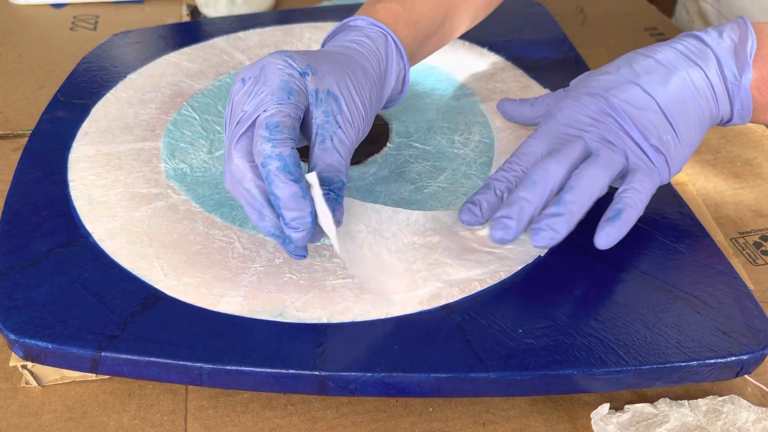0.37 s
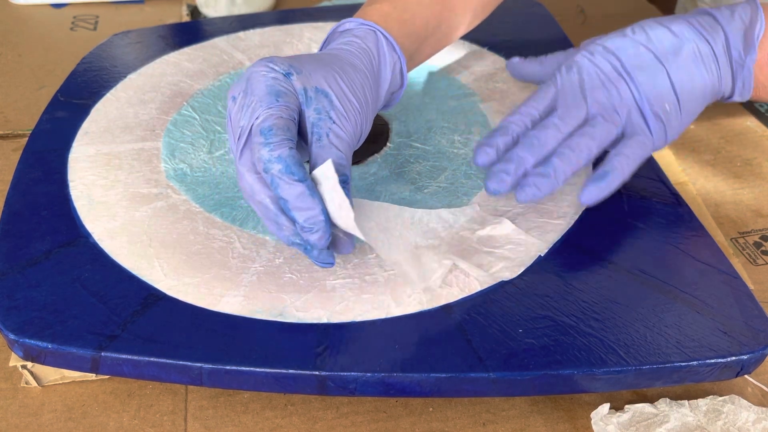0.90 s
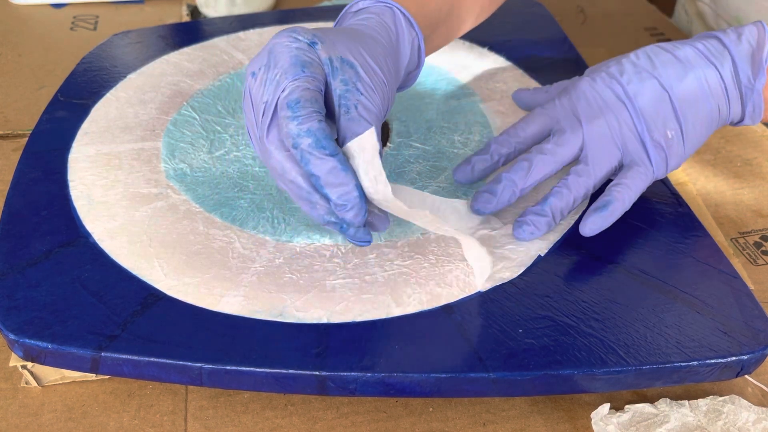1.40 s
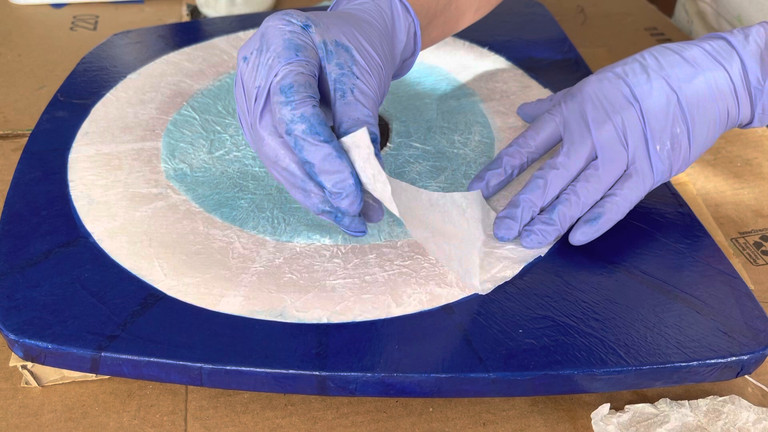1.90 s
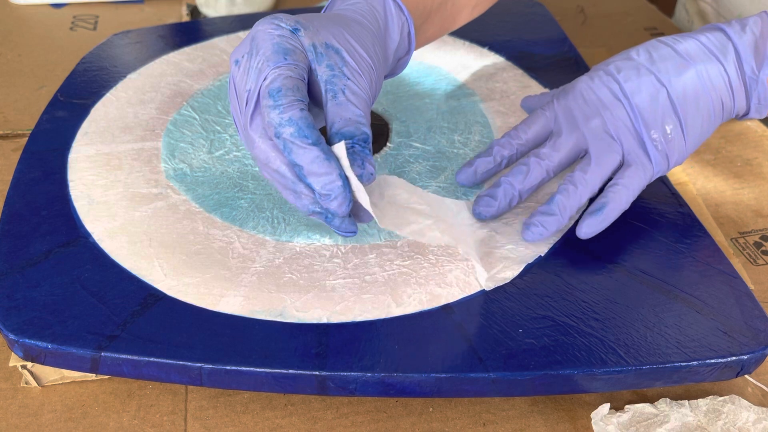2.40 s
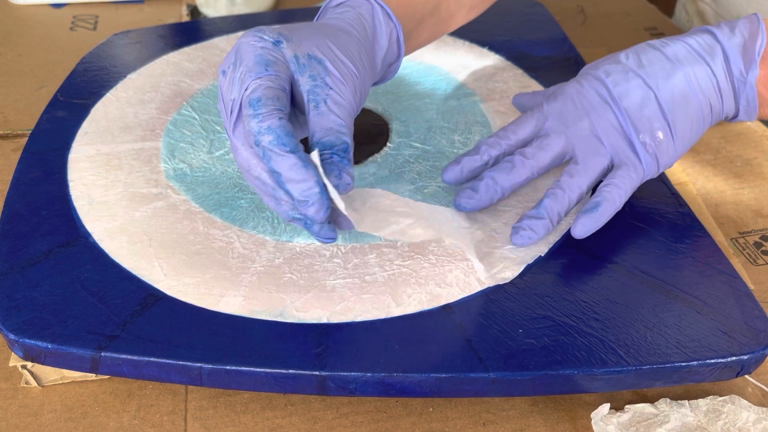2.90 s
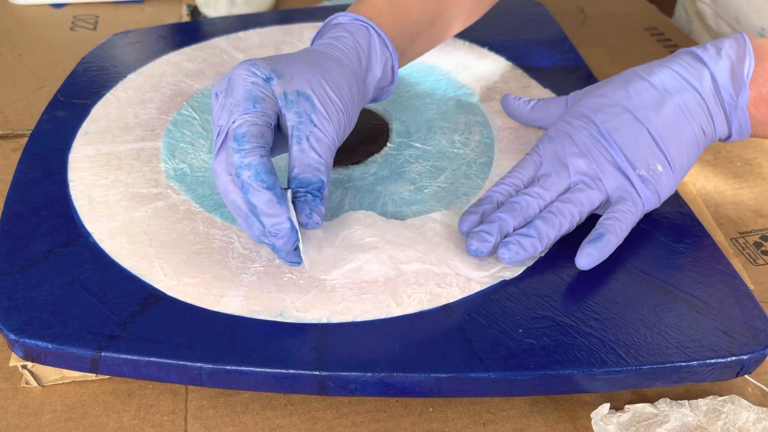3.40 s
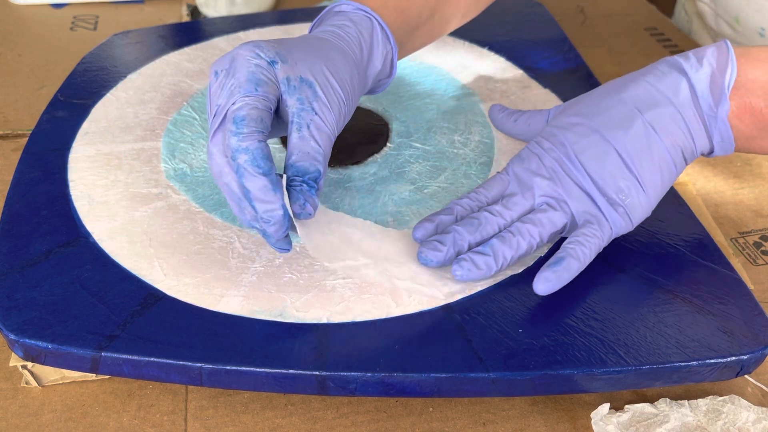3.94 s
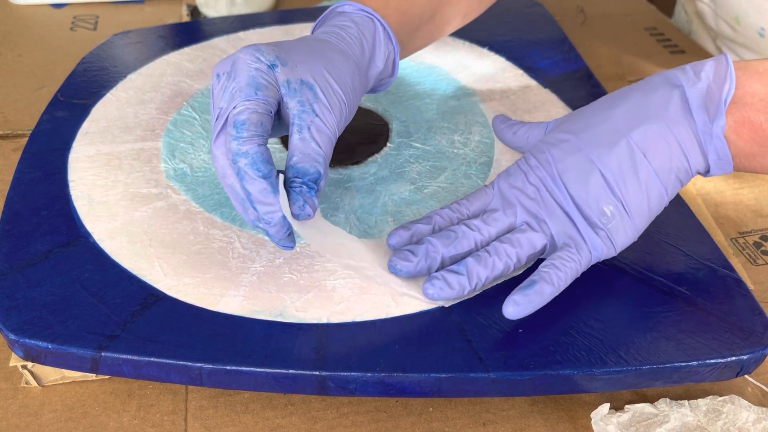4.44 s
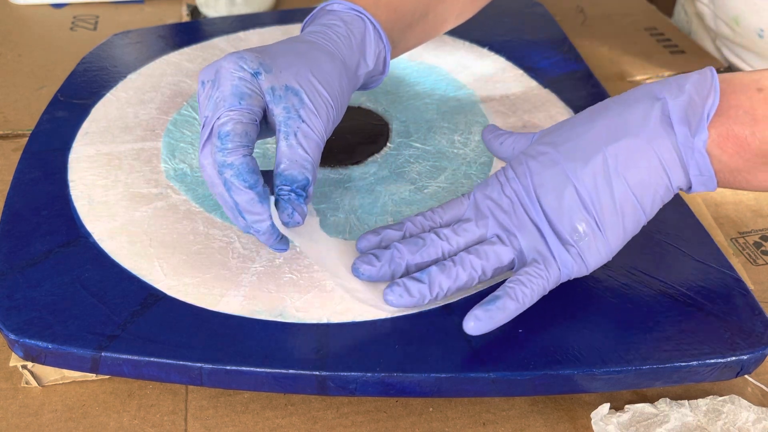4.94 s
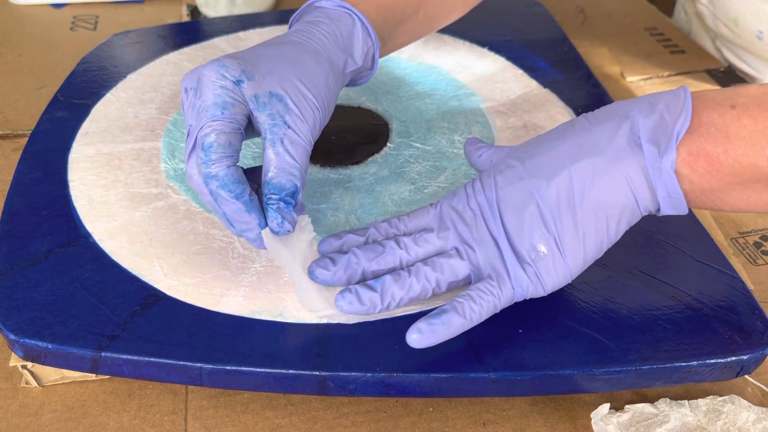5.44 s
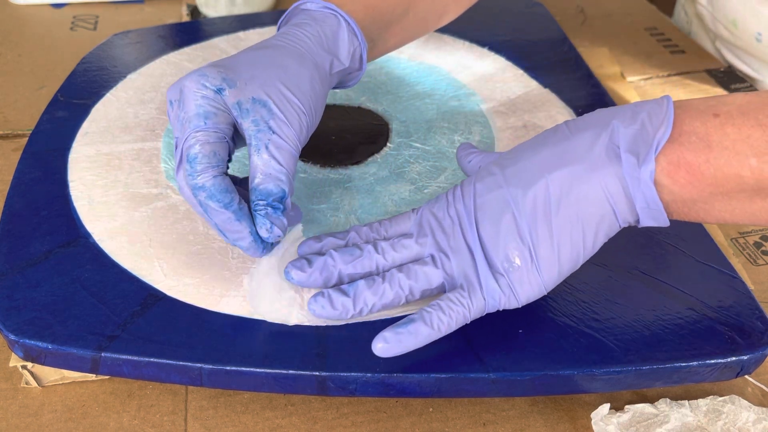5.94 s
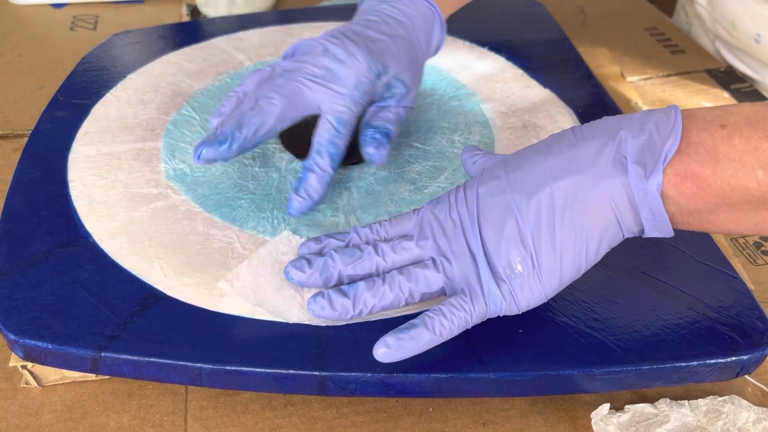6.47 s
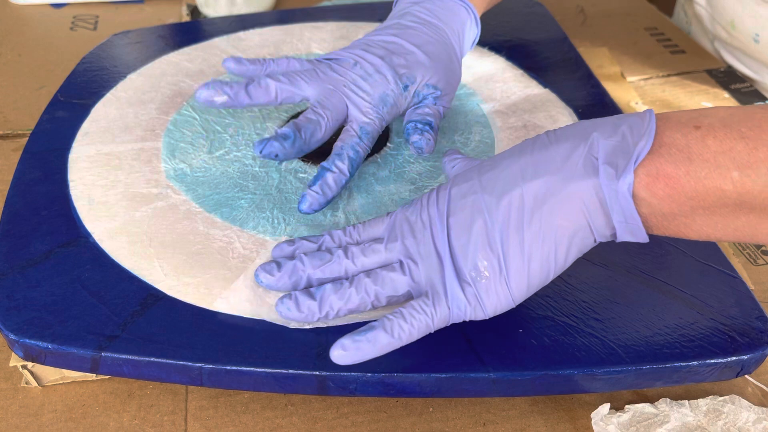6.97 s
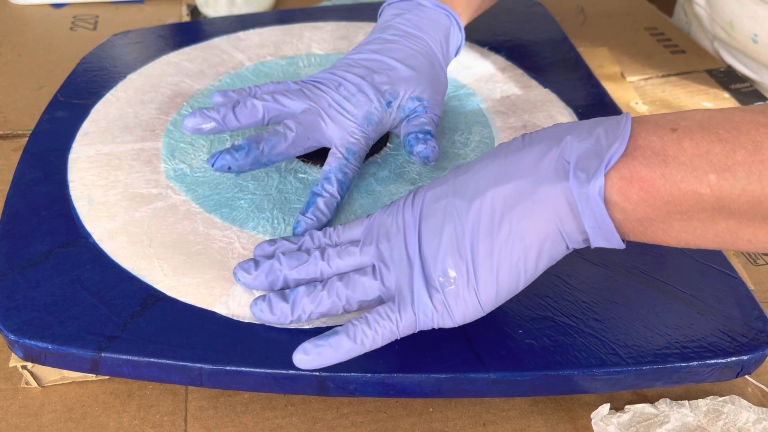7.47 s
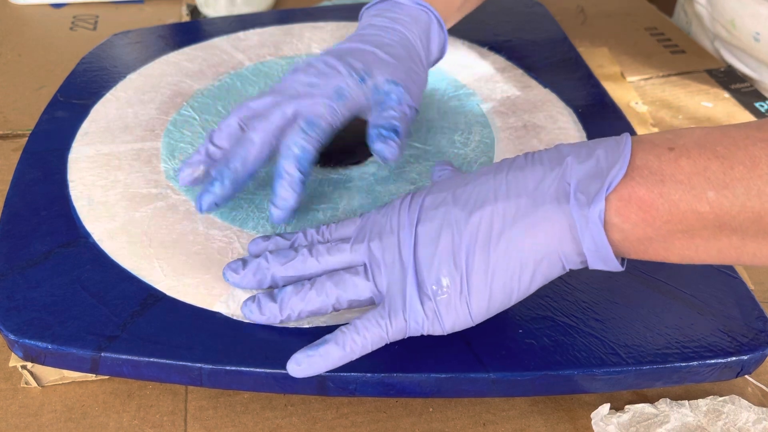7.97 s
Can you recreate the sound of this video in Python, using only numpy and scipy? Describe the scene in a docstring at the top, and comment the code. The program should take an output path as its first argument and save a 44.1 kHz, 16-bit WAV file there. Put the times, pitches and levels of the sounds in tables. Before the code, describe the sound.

Very close in stereo, gloved fingers tug and press thin tissue paper onto a board: crisp crackles and tiny snaps at first, while heavy footsteps elsewhere in the house boom low and rattle loose things. Then long hissing smoothing strokes take over, dotted with small ticks, until one sharp loud crackle near the end. A faint glove squeak follows in the quiet room.

```python
"""Gloved hands smoothing tissue paper

Gloved fingers press and smooth thin tissue paper onto a glued board, close under a two-port microphone.
The paper rustles in fine random grains; creases snap as short bursts of noise; a glove squeaks faintly.
Heavy steps elsewhere in the house set off decaying floor tones, thuds and rattles, over the filtered
noise of a quiet room and a separate low rumble."""
import sys
import numpy as np
from scipy import signal
from scipy.fft import rfft, irfft
from scipy.io import wavfile
from scipy.ndimage import uniform_filter1d

SR = 44100
rng = np.random.default_rng(int(sys.argv[2]) if len(sys.argv) > 2 else 0)


def volts(x):
    """Linear amplitude factor 10**(x/20) for a level x in dB, scalar or array-like."""
    e = np.asarray(x, float) / 20
    return 10 ** e


def master(y):
    """Save y as 16-bit WAV."""
    cut = np.clip(np.atleast_2d(y).T, -1, 1)
    pcm = np.round(cut * 32767)  # scale
    wavfile.write(sys.argv[1], SR, pcm.astype(np.int16))


N = 357342  # length in samples

# how far the left port runs ahead of the right: pitch_hz, lead_radians
LEFT_LEAD = [(0, 0), (600, 0.0), (950, 1.2), (1290, -0.1), (1640, -0.3), (3010, 1.0), (4910, 0.7),
             (6720, -0.1), (7750, 0.5), (8870, -0.1), (9730, -2.9), (10800, -3.4), (11500, -6.3),
             (13100, -6.3)]
# how much louder the left port is than the right: pitch_hz, difference_db
LEFT_LOUDER = [(60, 3), (150, 2), (360, 3), (880, 1), (2160, 2.5), (5280, 5.5), (8500, 1.5), (12000, -0.5)]


def rustle():
    """Thousands of fibres slip each second, in clumps, a few of them hard; the glove rubs below."""
    # colour of the rustle, brightest near 7 kHz, dark above 12 kHz: pitch_hz, relative_level_db (per Hz)
    paper_colour = [(1500, -32.5), (2500, -29), (3500, -9.5), (4800, -9), (6300, -0.5), (7200, 0.5),
                    (9000, -9), (9550, -9), (9850, -14.5), (10450, -27), (10800, -5.5), (11500, -20.5),
                    (12000, -38), (12400, -59.5), (13500, -65)]
    # colour of the dull rub of the glove: pitch_hz, relative_level_db (per Hz)
    rub_colour = [(300, -36), (600, -35), (1200, -15), (2200, -5.5), (3500, 9), (5000, -11), (8000, -59.5)]
    # rub relative to the rustle: time_s, level_db
    rub_share = [(0, -11.5), (.5, -8), (2, -8), (3.5, -14), (3.65, -9), (3.9, -13.5), (5.9, -7.5),
                 (6.9, -13.5), (7, -8), (7.3, -11.5), (7.53, -7), (7.62, -21), (7.8, -13), (8.1, -13.5)]
    press_crisp_db, stroke_crisp_db = 2, -0.52  # spread of slip sizes: pressing crackles, smoothing hisses
    slips_per_s = 5000

    level, stroking = fingers()
    crisp_db = press_crisp_db + (stroke_crisp_db - press_crisp_db) * stroking
    crisp_db = np.clip(crisp_db, 0, 8)  # at 0 dB all slips have one size before their random draw below
    clumps = evened(uniform_filter1d(uniform_filter1d(rng.standard_normal(N), 200), 200))
    size = volts(crisp_db * (np.minimum(rng.exponential(1, N), 5.5) + 1.8 * clumps))
    happens = rng.random(N) < slips_per_s / SR
    slips = size * happens * rng.standard_normal((2, N))
    slips *= level / np.sqrt(uniform_filter1d((slips ** 2).mean(0), 3000))  # follow the fingers
    slips += volts(-5.5) * room(slips)

    paper = unit_colour(slips + volts(-5.0) * ticks(level), paper_colour)
    rub_db = np.interp(np.arange(N) / SR, *np.transpose(rub_share))
    rub = volts(rub_db) * unit_colour(slips, rub_colour)
    return ports(patchy(paper + rub))  # the colour wanders at random


def fingers():
    """How hard the paper is worked at each moment, and the share of that power due to strokes."""
    # short presses and tugs, times over the last 20 dB: peak_s, level_db, rise_s, fall_s
    presses = [(.042, -46.5, 0.062, 0.031), (0.107, -39, 0.019, 0.028), (.18, -60.5, 0.19, 0.29),
               (0.34, -57.5, 0.049, 0.051), (.469, -67.5, 0.037, 0.072), (.6, -63.5, 0.15, .2),
               (.804, -65, 0.022, 0.053), (1.062, -50, 0.07, 0.024), (1.133, -43.5, 0.018, 0.048),
               (1.207, -50, 0.077, 0.091), (1.34, -66, .08, 0.43), (1.437, -57, 0.068, 0.25),
               (1.632, -61.5, 0.066, 0.019), (1.668, -82, .05, .12), (1.746, -49.5, 0.022, 0.068),
               (1.816, -50.5, 0.13, 0.041), (1.925, -58, 0.03, 0.15), (2.021, -58, 0.046, 0.14),
               (2.147, -48, .05, 0.086), (2.303, -67.5, 0.46, 0.39), (2.68, -53, 0.048, 0.072),
               (2.776, -52, 0.025, 0.078), (2.889, -54, 0.023, 0.031), (3.107, -62, 0.097, 0.097),
               (3.219, -62, 0.027, 0.051), (3.276, -56, 0.045, 0.12), (3.396, -69, .15, 0.077),
               (3.52, -68, 0.063, 0.18), (5.968, -61, 0.032, 0.14), (6.096, -55.5, 0.073, 0.087),
               (6.31, -53, 0.14, 0.15), (6.854, -31.5, 0.043, 0.055), (7.884, -55, 0.1, 0.22)]
    # two long strokes that smooth the paper down, one list each: time_s, rustle_level_db
    strokes = [
        [(3.57, -84), (3.62, -54.5), (3.686, -62.5), (3.835, -56), (4.047, -64.5), (4.113, -57), (4.374, -60.5),
         (4.496, -53.5), (4.582, -60), (4.927, -54.5), (5.3, -55.5), (5.781, -65), (5.833, -59.5), (5.923, -76)],
        [(6.33, -80), (6.378, -65.5), (6.465, -55), (6.621, -61.5), (6.659, -55.5), (6.793, -53.5),
         (6.948, -63.5), (7.056, -63), (7.295, -56.5), (7.363, -64.5), (7.445, -65), (7.485, -71),
         (7.695, -64.5), (7.752, -64), (8.0, -73), (8.1, -57)],
    ]
    hiss_floor_db = -78.5  # a faint steady hiss under the rustle

    t = np.arange(N) / SR
    pressing = volts(hiss_floor_db) ** 2
    for peak_s, db, rise_s, fall_s in presses:
        distance = np.maximum((peak_s - t) / abs(rise_s), (t - peak_s) / abs(fall_s))
        pressing = pressing + volts(2 * (db - 20 * distance))  # doubled dB gives power
    smoothing = 0
    for rows in strokes:
        smoothing = smoothing + volts(2 * np.interp(t, *np.transpose(rows), left=-200, right=-200))
    return np.sqrt(pressing + smoothing), smoothing / (pressing + smoothing)


def ticks(level):
    """Small creases pop at random, louder as the fingers work harder, each a few cycles at one of 12 pitches."""
    out, t = np.zeros(N), np.arange(100) / SR
    for hz in np.geomspace(3000, 11500, 12):
        happens = rng.random(N) < 14 / SR  # about 14 a second at each pitch
        size = volts(2.2 * np.minimum(rng.exponential(1, N), 4)) * happens
        pop = np.sin(2 * np.pi * hz * t) * hz * t * np.exp(-hz * t / 1.64)
        out += signal.oaconvolve(size * level, pop)[:N]
    return out


def snaps():
    """Each crease cracks in about a millisecond, leaning to its own pitch, and knocks the board."""
    # creases that crack at known moments, loud ones and faint lone ticks:
    # peak_s, level_db, pitch_hz, knock_db (into the board, relative)
    placed_creases = [(0.0397, -32, 7500, -32), (0.0917, -32.5, 6600, -15), (0.095, -27.5, 7150, -34),
                      (0.108, -28.5, 6450, -28), (.111, -29, 7200, -38), (.146, -37.5, 6330, -35),
                      (0.2376, -37.5, 6240, -33), (0.2614, -41, 5100, -26), (0.3077, -37, 6600, -19.5),
                      (0.3291, -34.5, 5400, -26), (0.4642, -39.5, 6550, -35), (0.5304, -45.5, 6860, -35),
                      (.5538, -44, 6600, -25), (0.654, -33, 5850, -25), (0.6862, -46, 4900, -17),
                      (0.7936, -39, 7400, -30), (.804, -41.5, 6900, -34), (1.0013, -52, 6430, -30),
                      (1.0313, -54, 6450, -30), (1.1051, -41, 6500, -23), (1.136, -21, 6100, -19),
                      (1.172, -33, 7100, -29), (1.1951, -28.5, 6660, -28), (1.1993, -36, 5910, -37),
                      (1.21, -36, 6550, -22), (1.2171, -19, 7500, -26.5), (1.2446, -29.5, 6750, -19),
                      (1.2646, -28, 6550, -31), (1.325, -33, 6740, -24.5), (1.416, -45, 6600, -3.5),
                      (1.429, -34, 6000, -16), (1.438, -31, 7800, -19), (1.4561, -31.5, 6800, -33),
                      (1.4926, -39, 6800, -4), (1.5227, -38.5, 6600, -14), (1.605, -41.5, 6700, -17),
                      (1.7205, -40.5, 4200, -22), (1.7352, -36, 6270, -15), (1.7465, -38.5, 7320, -10),
                      (1.7714, -36.5, 6300, -11), (1.9013, -39, 6500, -19), (1.9147, -32.5, 6700, -55),
                      (2.078, -45, 6540, -32), (2.101, -50, 6800, -33), (2.118, -48, 6000, -23),
                      (2.142, -32, 7760, -26), (2.2338, -33, 8150, -26), (2.29, -43, 6540, -20),
                      (2.322, -35, 6600, -25), (2.737, -40, 7100, -21), (2.7613, -36, 6950, -28),
                      (2.8698, -41.5, 6700, -42), (3.052, -49.5, 5640, -8), (3.264, -42.5, 6700, -30),
                      (3.39, -52, 6000, -22), (3.4402, -45.5, 7300, -40), (3.522, -53, 5770, -37),
                      (3.6121, -41, 6050, -18), (4.1067, -53, 6800, -34), (4.214, -36.5, 7000, -34),
                      (4.2543, -38, 6840, -34), (4.5437, -35.5, 5250, -28), (4.5936, -37.5, 7750, -26),
                      (4.687, -33.5, 7160, -59), (4.7888, -36.5, 6440, -34), (4.8723, -34.5, 6440, -37.5),
                      (4.8976, -32.5, 6700, -35), (5.0407, -36.5, 7590, -26), (5.154, -35.5, 5900, -31),
                      (5.1982, -44.5, 8800, -27), (5.294, -31.5, 7460, -37), (5.4712, -34.5, 7500, -40),
                      (5.8348, -43, 6300, -19), (5.9655, -38.5, 7800, -24), (6.0658, -45.5, 7060, -14),
                      (6.1406, -44.5, 6500, -18), (6.264, -38.5, 8200, -49), (6.299, -24, 7840, -52),
                      (6.3181, -19.5, 6700, -27), (6.3943, -39.5, 5260, -29), (6.4684, -49, 6860, -24),
                      (6.513, -40, 8600, -39), (6.5577, -36, 7040, -36), (6.5825, -36.5, 7300, -38),
                      (6.6458, -38.5, 7100, -25), (6.67, -36.5, 6260, -21.5), (6.6872, -19, 6400, -34),
                      (6.766, -36, 7210, -25), (6.777, -35, 5950, -28), (6.8032, -31, 5700, -33),
                      (6.8126, -33, 5760, -25), (6.83, -32, 5480, -28), (6.835, -33, 5500, -30),
                      (6.839, -25, 5440, -27), (6.8445, -20.5, 6020, -19), (6.852, -10, 5460, -38),
                      (6.8554, -6.5, 8440, -30), (6.8697, -30, 6890, -34), (6.875, -29, 6800, -29),
                      (7.496, -50, 6730, -30), (7.513, -47, 7100, -32), (7.6462, -53, 6740, -42),
                      (7.6798, -40.5, 7700, -33), (7.745, -41, 7060, -41), (7.7576, -37.5, 7500, -47),
                      (7.8401, -33, 9500, -24), (7.877, -32.5, 6750, -27), (7.9543, -38, 7900, -15.5),
                      (7.982, -44.5, 6490, -17), (8.0171, -47, 7420, -27)]
    # colour of a crack: pitch_hz, relative_level_db (per Hz)
    crack_colour = [(1300, -41.5), (3000, -16.5), (4000, -12), (5000, -8), (8000, -6), (10100, -8.5),
                    (11200, -1.5), (12600, -19.5), (13800, -35)]
    lean_width_hz = 1500

    rows = placed_creases + lesser()
    out, t = np.zeros(N), np.arange(-90, 500) / SR
    crack_noise, knock_noise = rng.standard_normal((len(rows), 2, len(t))).transpose(1, 0, 2)
    rise = np.exp(t / 0.00046)
    decay = np.exp(-abs(t) / 0.0006) + 0.17 * np.exp(-abs(t) / 0.0013)
    shape = np.where(t < 0, rise, decay)  # a burst that swells for half a millisecond, then dies
    cracks = colour(crack_noise * shape, crack_colour)
    knock_shape = np.exp(-abs(t) / np.where(t < 0, .001, .004))
    knock_band = signal.butter(2, [600, 2600], "band", fs=SR, output="sos")
    knocks = signal.sosfilt(knock_band, knock_noise * knock_shape)
    r = np.exp(-np.pi * lean_width_hz / SR)
    for (s, db, hz, knock_db), crack, knock in zip(rows, cracks, knocks):
        leaning = signal.lfilter([1], [1, -2 * r * np.cos(2 * np.pi * hz / SR), r * r], crack)
        crack = evened(crack) + 2.97 * evened(leaning)
        knock = volts(knock_db) * knock / abs(knock).max()
        add(out, s + t[0], volts(db) * (crack / abs(crack).max() + knock))

    hz = np.fft.rfftfreq(N, 1 / SR)
    half = volts(read(LEFT_LOUDER, hz) / 2)
    to_ports = np.array([half * np.exp(1j * read(LEFT_LEAD, hz)), 1 / half])
    pair = irfft(rfft(out) * to_ports, N)
    return pair + volts(-7.0) * room(pair)


def lesser(count=150):
    """Further creases crack at random moments, as strong as the paper is worked: rows as in snaps()."""
    over_db, stroke_db, spread_db = 7.5, 3.5, 2  # over the rustle; further lift under a stroke; spread
    usual_hz, spread_hz = 6700, 1840
    usual_knock_db, knock_spread_db = -36, 4

    when, size = rng.random((count, 2)).T
    pitch, knock = rng.standard_normal((count, 2)).T
    at = (when * (N - 600)).astype(int) + 100
    level, stroking = fingers()
    db = 20 * np.log10(level[at]) + over_db + stroke_db * stroking[at]
    db = db - spread_db * np.log(1 - .95 * size)  # a few are much louder
    return list(zip(at / SR, db, usual_hz + spread_hz * pitch, usual_knock_db + knock_spread_db * knock))


def squeaks():
    """Rubber sticks and slips on the wet paper: a narrow, trembling whistle."""
    # glove squeaks: start_s, end_s, first_pitch_hz, settled_pitch_hz, level_db (before fades and sides)
    whistles = [(3.02, 3.11, 1350, 1040, -80), (7.56, 7.76, 7200, 7030, -62), (8.02, 8.12, 7050, 7200, -61),
                (8.04, 8.1, 8800, 8800, -69)]
    tremble_filter = signal.butter(2, 70, fs=SR, output="sos")  # trembles slower than about 70 Hz

    out = np.zeros(N)
    for s, end, first_hz, last_hz, db in whistles:
        t = np.arange(0, end - s, 1 / SR)
        gliding_hz = last_hz + (first_hz - last_hz) * np.exp(-4 * t / t[-1])
        turns = np.cumsum(gliding_hz) / SR
        tremble = signal.sosfilt(tremble_filter, rng.standard_normal((len(t), 2)) @ [1, 1j])
        whistle = evened((tremble * np.exp(2j * np.pi * turns)).real)
        add(out, s, volts(db) * whistle * signal.windows.tukey(len(t), .5))
    return out * volts([[1.5], [-1.5]])  # a little louder on the left


def steps():
    """A soft heel sets the joists booming; the boards thud first and loose things rattle after."""
    # steps, levels relative: start_s, boom_db, floorboard_thud_db, rattle_db, thud_pitch_hz
    footfalls = [(0.516, -38, -47.5, -55.5, 311), (0.963, -33.5, -41, -51.5, 298),
                 (1.436, -22.5, -38.5, -41.5, 272), (1.986, -17.5, -37, -42, 249),
                 (2.584, -18, -42.5, -48, 167), (4.45, -73, -65.5, -68.5, 360),
                 (4.572, -69, -68.5, -97, 364), (4.68, -79, -67.5, -90, 280), (4.915, -77, -60.5, -66, 298),
                 (5.03, -62, -61, -74, 200), (5.22, -41.5, -56, -62, 218), (5.379, -65, -62.5, -70, 170),
                 (6.9, -71, -62.5, -75, 171), (7.2, -86, -59, -82, 230), (7.939, -53, -52, -65, 207)]
    # what the floor booms with; close neighbours make it swell and beat: pitch_hz, level_db, t60_s
    joist_tones = [(51.17, 3, 0.49), (59.3, 4.5, 0.64), (66.6, -9, 0.65), (43, -18, 0.22),
                   (79.5, -3.5, 0.53), (57, -17, 0.083)]
    # what the floorboards ring with: pitch_hz, level_db, t60_s
    board_tones = [(139, -6.5, 0.47), (156.05, 0, 0.5), (190, -2, 0.54), (254.5, -6, 0.54)]
    # colour of the thud: pitch_hz, relative_level_db (per Hz)
    thud_colour = [(56, -23.5), (95, 1.5), (108, -11.5), (141, -0.5), (194, -8), (344, -17), (420, -18),
                   (550, -37.5), (920, -120)]
    # colour of the rattle: pitch_hz, relative_level_db (per Hz)
    rattle_colour = [(250, -39), (420, -6.5), (648, -9), (954, -9.5), (1380, -20), (2440, -16.5),
                     (3800, -36), (4940, -46), (8360, -120)]
    sink_share, sink_s = 0.59, 0.13  # the thud's pitch sinks towards this share as the weight settles
    ring_db, ring_width_hz = 1.5, 81  # each spot of floor favours its own pitch
    waver_db = 1  # the level of thuds and rattles wavers at random

    boom, thud, rattle, ring = np.zeros(N), np.zeros(N), np.zeros(N), np.zeros((2, N))
    t = np.arange(SR) / SR
    joists, boards = np.zeros(SR), np.zeros(SR)
    for hz, db, t60 in joist_tones:  # all in step 90 ms after the heel lands
        joists += volts(db - 60 * t / t60) * np.cos(2 * np.pi * hz * (t - .09))
    joists *= (1 - np.exp(-t / 0.067)) ** 2  # the weight comes down slowly
    for hz, db, t60 in board_tones:
        boards += volts(db - 60 * t / t60) * np.sin(2 * np.pi * hz * t)
    boards *= 1 - np.exp(-t / 0.054)

    thud_noise, rattle_noise = rng.standard_normal((2, 2, N))
    body = evened(colour(thud_noise, thud_colour))
    r = np.exp(-np.pi * ring_width_hz / SR)
    for s, boom_db, thud_db, rattle_db, thud_hz in footfalls:
        # shift the noise down by the sinking pitch, keep a narrow band, shift it back up
        here = thud_noise[:, round(s * SR):][:, :SR]
        sinking_hz = thud_hz * (sink_share + (1 - sink_share) * np.exp(-t / sink_s))
        turn = np.exp(2j * np.pi * np.cumsum(sinking_hz) / SR)[:here.shape[1]]
        here = (turn * signal.lfilter([1], [1, -2 * r, r * r], here / turn)).real
        fade = volts(thud_db + ring_db - 60 * t / 0.5) * (1 - np.exp(-t / 0.028))
        add(ring, s, evened(here) * fade[:here.shape[1]])
        add(boom, s, volts(boom_db) * joists + volts(thud_db + 2.5) * boards)
        add(thud, s, volts(thud_db - 60 * t / 0.74) * (1 - np.exp(-t / 0.015)))
        add(rattle, s, volts(rattle_db - 60 * t / 0.69) * (1 - np.exp(-t / 0.036)) ** 2)

    wander = evened(uniform_filter1d(uniform_filter1d(rng.standard_normal(N), 500), 500))
    waver = evened(volts(waver_db * wander))
    booming = boom * volts([[.7], [-.7]])
    thudding = ports(waver * (thud * body + ring))
    rattling = patchy(waver * rattle * evened(colour(rattle_noise, rattle_colour)))  # from all around
    return booming + thudding + rattling


def hush():
    """The air of the room, and a separate low rumble around 61 Hz that comes and goes."""
    # colour of the air: pitch_hz, relative_level_db
    air_colour = [(22, -57), (50, -10), (80, 4), (115, -8.5), (170, -13), (330, -16.5), (500, -24),
                  (1500, -36.5), (2600, -53)]
    # the low rumble comes and goes: time_s, level_db
    rumble_level = [(0, -65), (.5, -66.5), (1, -58), (2, -55), (2.9, -64), (3.1, -60.5), (3.6, -60.5),
                    (3.9, -62), (4.9, -58.5), (5.5, -70), (6, -66.5), (6.5, -70), (7, -71), (7.5, -66),
                    (7.7, -60.5), (8.1, -61)]

    hz = np.fft.rfftfreq(N, 1 / SR)
    air_noise, rumble_noise = rfft(rng.standard_normal((2, 2, N)))
    air = volts(-67) * evened(irfft(air_noise * volts(read(air_colour, hz)), N))
    rumble = evened(irfft(rumble_noise / (1 + ((hz - 61) / 6) ** 2), N))  # a narrow band of noise
    rumble_db = np.interp(np.arange(N) / SR, *np.transpose(rumble_level))
    return ports(air + volts(rumble_db) * rumble)


def room(x):
    """Sparse reflections of random sign, each band dying at its own speed, other ones per channel."""
    # how fast the reflections die: pitch_hz, t60_s
    dying = [(500, 0.3), (2000, 0.13), (6000, 0.042), (12000, 0.1)]
    taps = rng.choice([-1., 1.], (2, SR // 2)) * (rng.random((2, SR // 2)) < .06)
    taps[:, :90] = 0  # the first wall is a few ms away
    hz, t, z = signal.stft(taps, SR, nperseg=128)
    tail = signal.istft(z * volts(-60 * t / read(dying, hz)[:, None]), SR, nperseg=128)[1]
    return signal.fftconvolve(x, tail / np.linalg.norm(tail[0]), axes=1)[:, :N]


def ports(x):
    """Two unrelated versions of a sound become left and right: partly alike, shifted in phase and level."""
    # left-right likeness: pitch_hz, likeness (0 to 1)
    likeness = [(60, 1), (130, 0.83), (280, 0.8), (600, 0.61), (1300, 0.43), (2800, 0.9), (6000, 0.93),
                (12900, 0.8)]
    hz = np.fft.rfftfreq(N, 1 / SR)
    a, b = rfft(x)
    same = np.clip(read(likeness, hz), 0, 1)
    half = volts(read(LEFT_LOUDER, hz) / 2)
    left = a * np.exp(1j * read(LEFT_LEAD, hz)) * half
    right = (same * a + np.sqrt(1 - same ** 2) * b) / half
    return irfft(np.array([left, right]), N)


def patchy(x):
    """Patches of pitch and time swell and sink at random."""
    patch_db = 1.5  # typical swing, before the overall level is evened
    z = signal.stft(x, nperseg=256)[2]
    field = rng.standard_normal(z.shape[1:])
    field = evened(uniform_filter1d(uniform_filter1d(field, size=7, axis=0), size=12, axis=1))
    return signal.istft(z * evened(volts(patch_db * field)), nperseg=256)[1][:, :N]


def colour(x, points):
    """Causal (minimum-phase) filter with the given spectrum, no deeper than -100 dB."""
    db = np.maximum(read(points, np.fft.rfftfreq(8192, 1 / SR)), -100)
    fold = irfft(np.log(volts(db)))
    fold[1:4096] *= 2  # folding the cepstrum forward puts the energy as early as possible
    fold[4097:] = 0
    taps = irfft(np.exp(rfft(fold)))[:4096]
    taps = taps.reshape((1,) * (x.ndim - 1) + (-1,))
    return signal.oaconvolve(x, taps, axes=-1)[..., :x.shape[-1]]


def unit_colour(x, points):
    """Colour that keeps the level of white noise."""
    gain = volts(read(points, np.linspace(0, SR / 2, 2000)))
    return colour(x, points) / np.sqrt(np.mean(gain ** 2))


def read(points, hz):
    """Reads a table along a log-frequency axis."""
    f, value = np.transpose(points)
    return np.interp(np.log(hz + 1), np.log(f + 1), value)


def evened(x):
    """Scales a signal to an rms of 1."""
    return x / np.sqrt(np.mean(x ** 2) + 1e-20)


def add(mix, s, sound):
    """Mixes a sound in at s seconds, cut off at the end of the mix."""
    part = mix[..., round(s * SR):][..., :sound.shape[-1]]
    part += sound[..., :part.shape[-1]]


def scene():
    """Paper and glove close by, steps through the floor, and the quiet room with its rumble."""
    return rustle() + snaps() + squeaks() + steps() + hush()


def band_limit(x):
    """A steep low-pass at the top of the band."""
    return signal.sosfilt(signal.butter(12, 13540, fs=SR, output="sos"), x)


def record(dry):
    """Turns the finished mix into the sound that is written out."""
    return band_limit(dry)


dry = scene()
out = record(dry)
master(out)
```